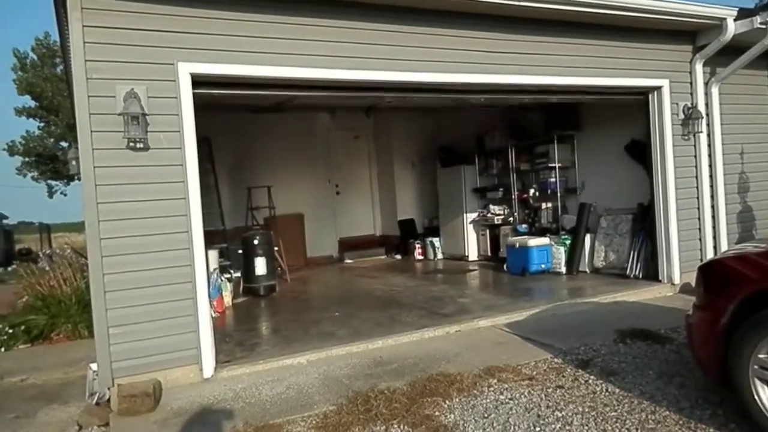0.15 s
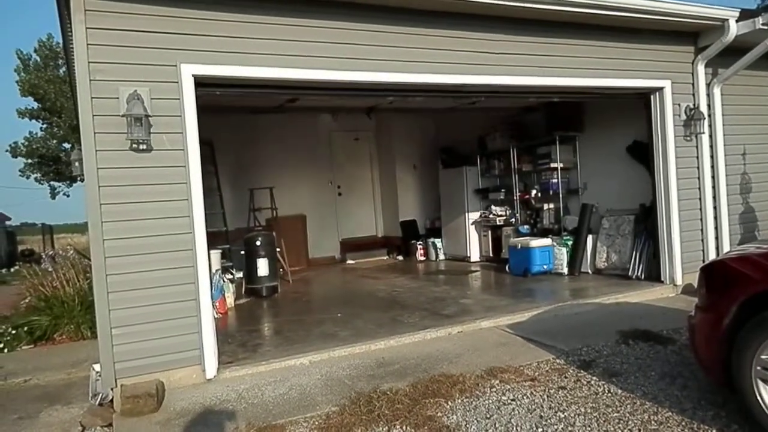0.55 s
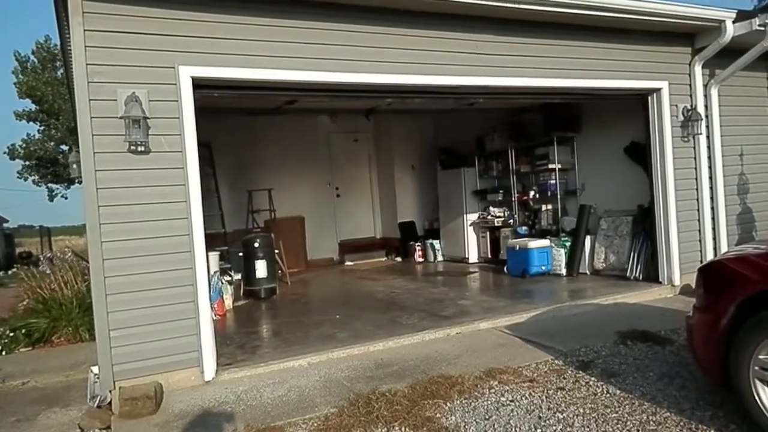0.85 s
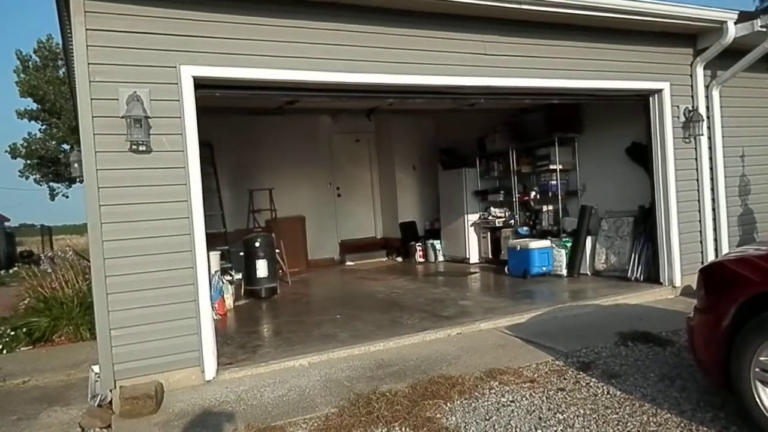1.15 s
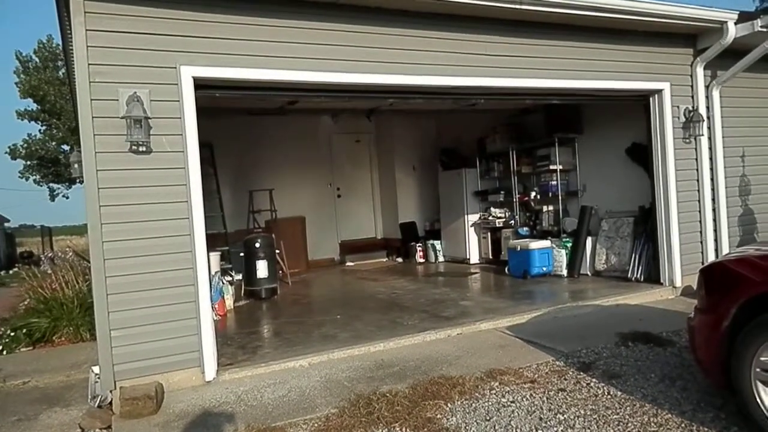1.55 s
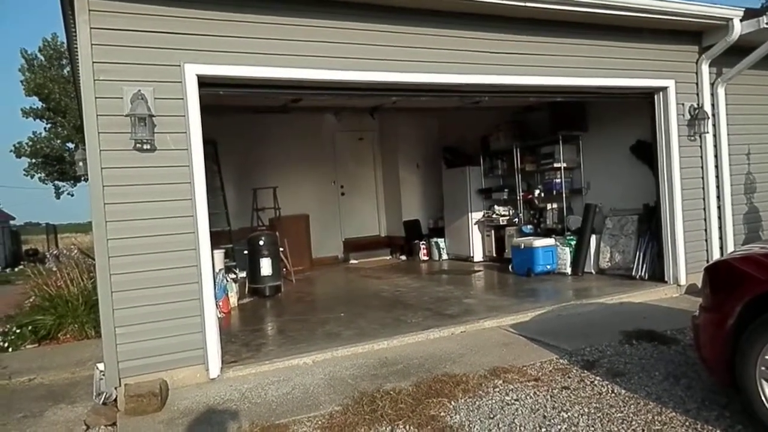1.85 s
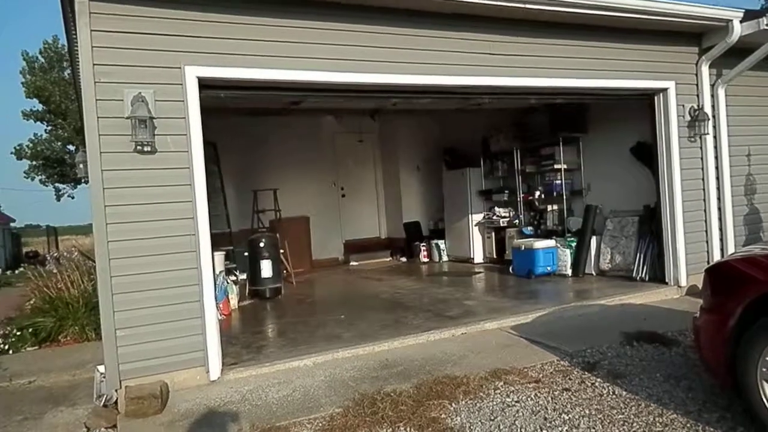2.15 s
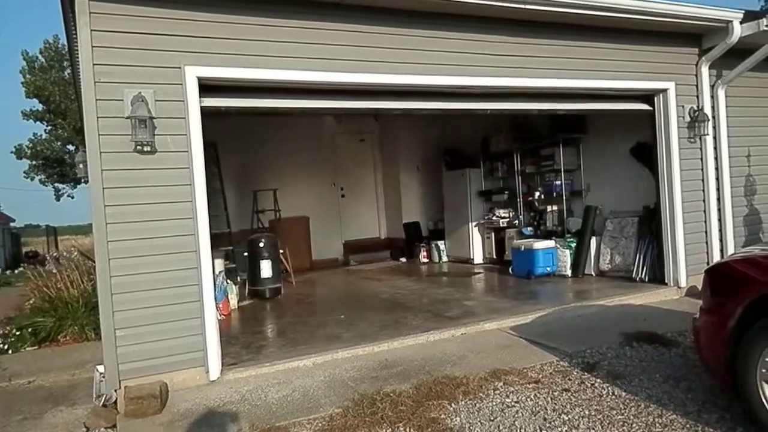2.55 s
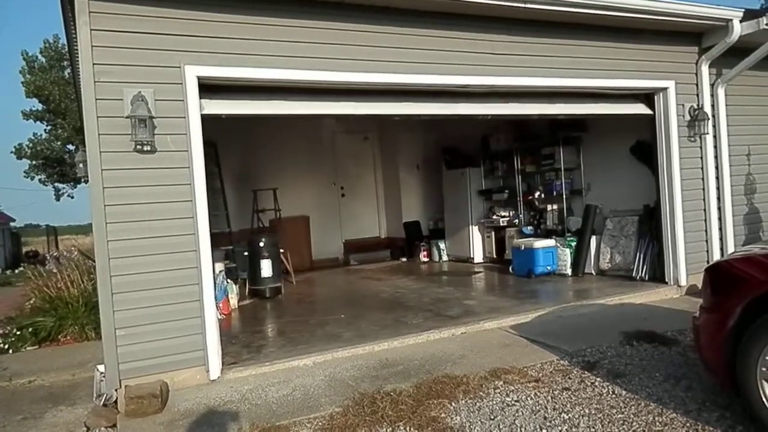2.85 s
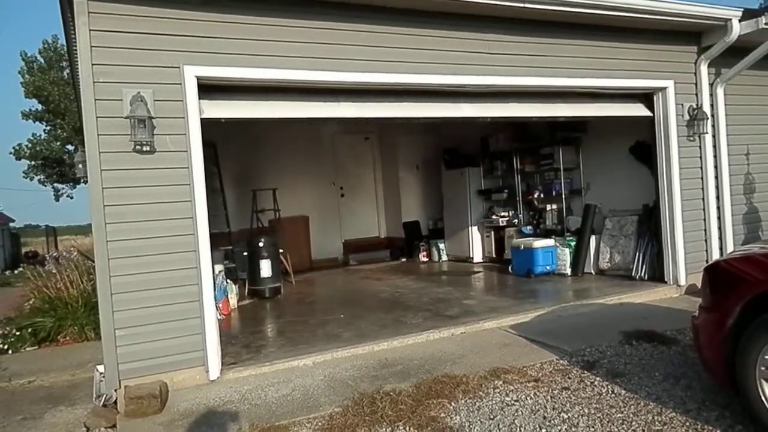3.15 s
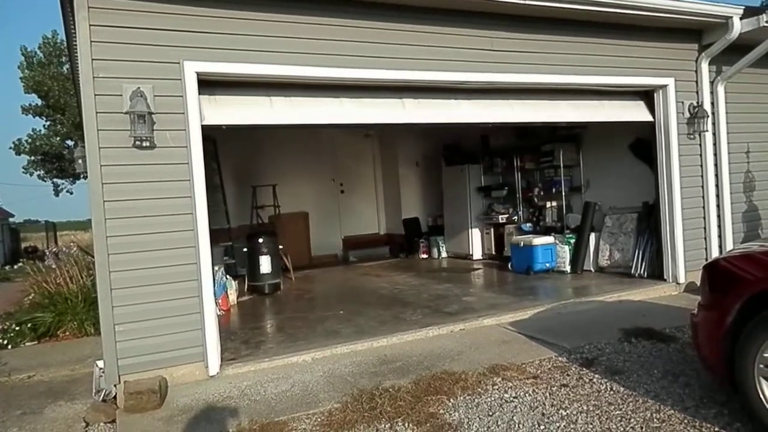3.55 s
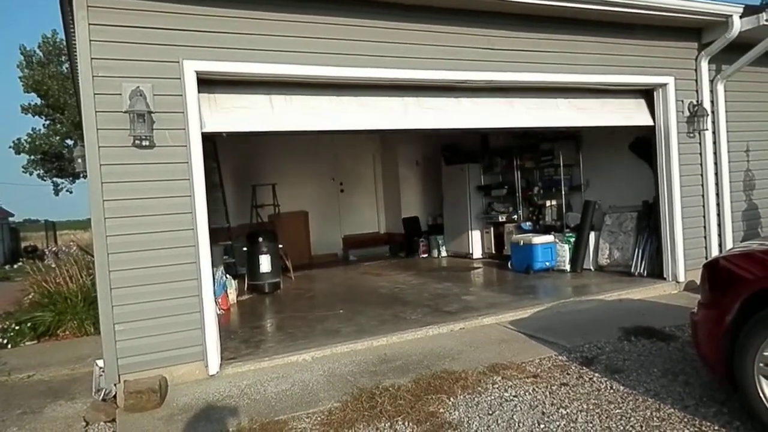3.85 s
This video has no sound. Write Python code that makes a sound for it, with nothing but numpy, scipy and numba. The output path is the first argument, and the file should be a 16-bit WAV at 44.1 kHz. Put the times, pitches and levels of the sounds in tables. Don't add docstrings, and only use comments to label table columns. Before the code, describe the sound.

Electric garage door opener hums low and halts with a clatter; after a pause of light knocks and distant birds, it restarts with booming panels and roller rattles, while wind buffets the outdoor microphone.

```python
import sys
import numpy as np
from scipy import signal
from scipy.fft import rfft, irfft
from scipy.io import wavfile
from scipy.ndimage import uniform_filter1d
from numba import njit

SR = 44100
rng = np.random.default_rng(int(sys.argv[2]) if len(sys.argv) > 2 else 0)


def put_to_file(sound):
    columns = np.atleast_2d(sound).T
    safe = np.clip(columns, -1, 1)
    whole_steps = np.round(safe * 32767)
    wavfile.write(sys.argv[1], SR, whole_steps.astype(np.int16))


def boost(x):
    u = np.asarray(x, float) / 20
    return 10 ** u


N = 176400
T = np.arange(N) / SR

# multiple of the hum, level going up/dB, level going down/dB, share of the buzz
HUM = [(1, -30.5, -39, 0.17), (2, -40.5, -41, 0.023), (3, -46, -43, 1), (4, -57, -56.5, 0.74),
       (6, -53, -61.5, 0.51)]
# t/s, level/dB
DRIVE = [(.1, -2.5), (.165, 1), (.195, -3.5), (.235, -10.5), (.27, -20), (.42, -39), (2.12, -45.5),
         (2.16, -5), (2.22, 1), (2.29, 0.5), (2.6, 2.2)]
# t/s, level/dB
BUZZ = [(2.2, -2), (2.7, 0), (3.0, -3), (3.15, -4), (3.36, -12.5), (3.43, 1.5), (3.75, -1.5), (3.85, -9.5),
        (3.92, -0.5)]
# t/s, level/dB
WHINE = [(2.15, 1), (2.4, -8.5), (3.05, -8), (3.15, 7), (3.7, -1), (3.8, -2), (4, 5)]
# t/s, level/dB
LOAD = [(0, 3.5), (.12, 2.5), (.2, 5.5), (.3, -0.5), (2.2, 1), (2.3, -0.7), (2.6, 1.5), (2.85, -3.5),
        (2.93, -2), (2.98, 2), (3.1, -3), (3.5, -1.5), (3.8, -2), (4, -0.9)]
# f/Hz, level per Hz/dB
PANELS = [(40, -12.5), (110, -1.5), (430, -12.5), (550, -17), (950, -29.5), (1400, -28.5), (4500, -52),
          (14000, -58.5)]
# f/Hz, width/Hz, level/dB
BOOM = [(303.3, 89, -6.5), (396, 78, -9), (750, 330, -11)]
# t/s, level/dB, rise/s, fall/s
RATTLES = [(.2, -48, 0.052, 0.034), (0.248, -45.5, 0.021, 0.06), (2.3, -53, 0.094, 0.25),
           (2.5, -58, 0.029, 0.085), (2.63, -55, 0.046, 0.073), (2.75, -67.5, 0.026, 0.11),
           (2.955, -49.5, 0.018, 0.027), (3.151, -56.5, 0.042, 0.056), (3.29, -54, 0.037, 0.069),
           (3.37, -62, 0.012, 0.045), (3.631, -56.5, 0.13, 0.18), (.04, -61, 0.037, 0.049),
           (2.98, -44.5, 0.021, 0.056), (3.92, -64.5, 0.034, 0.043), (2.16, -61, 0.0094, 0.015)]
# f/Hz, level per Hz/dB
STEEL = [(400, -9), (800, -6.5), (1500, -20.5), (2800, -20.5), (4300, -26), (8700, -26), (11000, -38),
         (15700, -42)]
# f/Hz, width/Hz, level/dB
RAIL = [(700, 130, 6), (820, 60, 5), (1400, 90, 6), (2520, 90, 8), (3000, 100, 8), (3680, 120, 0),
        (7240, 150, 0), (8700, 250, 1)]
# t/s, peak level/dB, f/Hz, low mode level/dB, upper modes level/dB
KNOCKS = [(1.0675, -41.5, 1000, -5, -6), (1.109, -42, 1040, -12, -6), (1.1119, -40, 1040, -12, -3),
          (1.117, -47, 1040, -12, 3), (1.126, -43, 1040, -12, -16), (1.14, -44, 1040, -12, -16),
          (1.158, -38.5, 1050, -12, -15), (1.192, -38.5, 1055, -14, -16), (1.311, -49, 1000, -10, -12),
          (1.846, -47, 1000, -3, -8), (1.8568, -34, 1060, -1, -4), (1.8596, -30.5, 1060, -3, -3),
          (1.8638, -42, 1060, -9, 2), (1.901, -39, 980, -9, -5), (1.9385, -39, 1030, -4, -8),
          (1.9414, -34.5, 1030, -14, -6), (2.154, -38, 950, -2, -4), (2.161, -42, 900, -2, -4)]
# frequency ratio, level/dB, t60/s
SHELL = [(1.39, 0, .018), (1.72, -12, .009), (2.45, -11, .011), (2.7, -14, .01), (3.5, -22, .008)]
# t/s, peak level/dB, f/Hz, width/Hz
TICKS = [(0, -38, 6000, 20000), (.422, -56, 1200, 2200), (.488, -62, 5000, 9000), (.555, -48, 700, 1000),
         (.623, -65, 2100, 700), (.649, -51, 900, 1300), (.688, -47, 850, 1400), (.822, -53, 800, 900),
         (.889, -66, 5000, 6000), (.957, -64, 2100, 250), (1.024, -55, 1000, 1100), (1.222, -55, 2100, 300),
         (1.222, -66, 4000, 5000), (1.274, -58, 1300, 1500), (1.3, -57, 1300, 1500), (1.36, -65, 2050, 250),
         (1.49, -63, 2080, 250), (1.556, -60, 2050, 250), (1.556, -68, 4000, 5000), (1.622, -67, 2050, 250),
         (1.79, -58, 1200, 1500), (1.9412, -40, 1650, 600), (2.125, -60, 7000, 12000),
         (3.643, -52, 2490, 2500), (3.857, -49, 2200, 2000)]
# t/s, length/s, level/dB, top f/Hz
CHIPS = [(0.511, 0.04, -71.5, 6110), (0.825, 0.054, -64, 6220), (0.936, 0.026, -75.5, 5100),
         (1.171, 0.042, -68.5, 6340), (1.507, 0.045, -67.5, 6220), (1.869, 0.057, -70.5, 6240),
         (2.49, 0.055, -67.5, 6000), (3.485, 0.06, -78, 6220), (3.846, 0.045, -68.5, 6240)]
# t/s, length/s, level/dB, from f/Hz, to f/Hz
SLURS = [(0.455, 0.02, -75, 3800, 3740), (0.468, 0.032, -75, 3500, 2630), (0.616, 0.016, -74, 5100, 5000),
         (0.851, 0.035, -75, 5400, 4500), (1.464, 0.082, -75, 5100, 2820), (1.533, 0.018, -82, 2850, 3460),
         (1.551, 0.045, -74, 3400, 3810), (1.59, 0.018, -72, 3200, 2830), (1.617, 0.015, -79, 2750, 2660),
         (1.752, 0.074, -80, 2480, 2280), (1.797, 0.031, -81, 2560, 2640), (1.948, 0.033, -75, 2650, 2630),
         (2.362, 0.013, -65, 8600, 8500), (2.704, 0.014, -77, 10500, 10360)]
# t/s, level/dB, length/s
PUFFS = [
    (0.066, -51, 0.061),
    (1.96, -51.5, 0.069),
    (2.077, -56, 0.036),
    (2.265, -39.5, 0.057),
    (2.65, -48, .05),
    (3.25, -47, 0.068),
    (3.468, -34.5, 0.027),
    (3.955, -56, 0.04),
]
# f/Hz, level per Hz/dB
TRAFFIC = [(18, 0.5), (80, -9.5), (190, -4), (310, -4.5), (430, -18.5), (900, -28.5), (1300, -42),
           (1800, -60)]
# f/Hz, level per Hz/dB
HISS = [(1400, -2.5), (3650, -.5), (4200, -5), (8500, -3.5), (9100, -19), (12800, -16), (13600, -4.5),
        (15750, -3.5)]

HUM_HZ, WANDER_DB = 120.0, 1.2
PANELS_DB, BOOM_DB = -41, -42.5
START_S, RUMBLE_STOP_S, RUMBLE_FALL_DB_S = 2.15, 0.33, 108
GRIT_PER_S, GRIT_DB, GRIT_S, RAIL_WANDER_DB = 1200, 2, .004, 3
LOW_RATIO, LOW_T60_S, MAIN_T60_S = .68, .02, .018
KNOCK_TAIL_DB, KNOCK_TAIL_S, CRACK_DB, TICK_S = -28, .015, -30, .0025
CHIP_DROP, CHIP_RISE_S, CHIP_TRILL, CHIP_ECHO_DB = .22, .005, .03, -4
PUFF_HZ, TRAFFIC_DB, HISS_DB = 35.4, -46.5, -74
GATE_FROM_HZ, GATE_TO_HZ, TOP_HZ = 1500, 13400, 15750
GATE_DB, GATE_CHANCE_DB, GATE_CUT_DB = -101.3, 3.5, -22


def level(x, db):
    return x * boost(db) / np.sqrt(np.mean(x ** 2))


@njit
def svf(x, hz, width):
    y, b, l = np.empty(len(x)), 0., 0.
    g, k = np.tan(np.pi * hz / SR), width / hz
    for i in range(len(x)):
        v = (b + g * (x[i] - l)) / (1 + g * (g + k))
        b, l, y[i] = 2 * v - b, l + 2 * g * v, k * v
    return y


def curve(table):
    return np.interp(T, *np.array(table, float).T)


def walk(rate):
    k = int(SR / rate)
    held = np.repeat(rng.standard_normal(N // k + 1), k)
    return 1.79 * uniform_filter1d(uniform_filter1d(held, k), k)[:N]


def colour(x, table):
    f = np.arange(N // 2 + 1) * SR / N + 1e-3
    hz, db = np.array(table, float).T
    gain_db = np.interp(np.log(f), np.log(hz), db, left=-90, right=-90)
    return irfft(rfft(x) * boost(gain_db), N)


def flicker(table, swell_db, own_db, rate):
    swell, out = swell_db * walk(1.5), 0
    for hz in 30 * 2. ** np.arange(10):
        band = colour(rng.standard_normal(N), [(hz / 2, -12), (hz, 0), (hz * 2, -12)])
        out = out + band * boost(swell + own_db * walk(rate))
    return colour(out, table)


def add(out, start_s, x):
    i = int(start_s * SR)
    out[i:i + len(x)] += x[:N - i]


def motor():
    out = 0
    for k, up_db, down_db, share in HUM:
        phase = 2 * np.pi * (k * HUM_HZ * T + rng.random() + 0.012 * walk(16))
        down = down_db + share * curve(BUZZ) + (k == 6) * curve(WHINE)
        wander = WANDER_DB * (1 + 2 * share ** 2) * walk(12)
        db = np.where(T < 1, up_db, down) + curve(DRIVE) + wander
        out = out + np.sqrt(2) * np.sin(phase) * boost(db)
    return out


def door():
    stopping = boost(-RUMBLE_FALL_DB_S * np.clip(T - RUMBLE_STOP_S, 0, None))
    starting = np.clip((T - START_S) / 0.0096, 0, 1)
    boom = 0
    for hz, width, db in BOOM:
        ring = svf(svf(rng.standard_normal(N), hz, width), hz, width)
        boom = boom + boost(db + 2 * walk(14)) * level(ring, 0)
    rumble = level(flicker(PANELS, swell_db=0.0, own_db=2.0, rate=16), PANELS_DB)
    return (rumble + level(boom, BOOM_DB)) * (stopping + starting) * boost(curve(LOAD))


def rollers():
    shake = 0
    for s, db, rise, fall in RATTLES:
        shape = np.where(T < s, -((T - s) / rise) ** 2, (s - T) / fall)
        shake = shake + boost(db) * np.exp(shape)
    chance, size = rng.random((2, N))
    clicks = (chance < GRIT_PER_S / SR) * boost(-GRIT_DB * np.log(size + 1e-9))
    power = signal.lfilter([1], [1, -np.exp(-1 / (GRIT_S * SR))], clicks ** 2)
    grit = level(np.sqrt(power) * rng.standard_normal(N), 6.3)
    grit = grit + level(flicker([(300, 0.013), (16000, 0.011)], swell_db=5.5, own_db=-5.5, rate=33), 0)
    rail = sum(boost(db + RAIL_WANDER_DB * walk(18)) * svf(grit, hz, width) for hz, width, db in RAIL)
    grit = grit + shake / shake.max() * rail
    return level(colour(grit, STEEL), 0) * shake


def knocks():
    out, t = np.zeros(N), T[:2600]
    for s, db, hz, low_db, upper_db in KNOCKS:
        noise = rng.standard_normal(len(t))
        modes = [(LOW_RATIO, low_db, LOW_T60_S), (1, 0, MAIN_T60_S)]
        modes += [(ratio, mode_db + upper_db, t60) for ratio, mode_db, t60 in SHELL]
        ring = 0
        for ratio, mode_db, t60 in modes:
            decay = np.exp(-np.log(1000) * t / t60)
            ring = ring + boost(mode_db) * np.sin(2 * np.pi * hz * ratio * t) * decay
        crack = boost(CRACK_DB) * svf(noise, 5200.0, 6000.0) * np.exp(-t / .0015)
        tail = boost(KNOCK_TAIL_DB) * 3 * svf(noise, 1280.0, 1000.0) * np.exp(-t / KNOCK_TAIL_S)
        contact = 1 - np.exp(-t / .0004)
        add(out, s, boost(db) * (1.2 * ring * contact + crack + tail))
    return out


def ticks():
    out, t = np.zeros(N), T[:2600]
    for s, db, hz, width in TICKS:
        burst = rng.standard_normal(len(t)) * np.exp(-t / TICK_S)
        burst = svf(svf(burst, hz, width), hz, 2 * width)
        add(out, s, boost(db) * burst / abs(burst).max())
    return out


def note(hz, db):
    envelope = np.sin(np.linspace(0, np.pi, len(hz))) ** 0.12
    return boost(db) * np.sqrt(2) * np.sin(2 * np.pi * np.cumsum(hz) / SR) * envelope


def birds():
    out, waver = np.zeros(N), walk(220)
    for s, length, db, top_hz in CHIPS:
        t = T[:int(length * SR)]
        w = waver[int(s * SR):][:len(t)]
        leap = CHIP_DROP * np.exp(-t / CHIP_RISE_S)
        trill = CHIP_TRILL * abs(w) * t / length
        add(out, s, note(top_hz * (1 - leap - trill), db + 2.6 * w - 2.7 * t / length))
    for s, length, db, from_hz, to_hz in SLURS:
        w = waver[int(s * SR):][:int(length * SR)]
        glide = np.geomspace(from_hz, to_hz, len(w))
        add(out, s, note(glide * (1 + 0.018 * w), db + 2 * w))
    echo = rng.standard_normal(5000) * np.exp(-T[:5000] / .018)
    return out + boost(CHIP_ECHO_DB) * signal.fftconvolve(out, echo / np.linalg.norm(echo))[:N]


def wind():
    gust = sum(boost(db) * np.exp(-((T - s) / length) ** 2) for s, db, length in PUFFS)
    buffet = svf(svf(rng.standard_normal(N), PUFF_HZ, 50.), PUFF_HZ, 60.)
    return level(buffet, 0) * gust


def traffic():
    return level(flicker(TRAFFIC, swell_db=.2, own_db=.8, rate=14), TRAFFIC_DB)


def hiss():
    return level(flicker(HISS, swell_db=1.0, own_db=1.0, rate=13), HISS_DB)


def scene():
    near = motor() + door() + rollers() + knocks() + ticks()
    return (near + birds() + wind() + traffic() + hiss())[None]


def gate(x):
    hz, _, z = signal.stft(x, SR, nperseg=2048, noverlap=1536, boundary="odd")
    hz, z_low = hz[:1024], z[:1024]
    db = 10 * np.log10(np.mean(abs(z_low.reshape(128, 8, -1)) ** 2, axis=1) + 1e-20)
    frames = db.shape[1]
    held = np.repeat(rng.standard_normal((128, frames // 6 + 1)), 6, axis=1)[:, :frames]
    faint = uniform_filter1d(db, size=3) + GATE_CHANCE_DB * held < GATE_DB
    band_hz = hz[::8, None]
    shut = faint & (band_hz > GATE_FROM_HZ) & (band_hz < GATE_TO_HZ)
    gain = np.repeat(np.where(shut, boost(GATE_CUT_DB), 1), 8, axis=0) * (hz[:, None] < TOP_HZ)
    gated = np.vstack([z_low * gain, 0 * z[1024:]])
    return signal.istft(gated, SR, nperseg=2048, noverlap=1536)[1][:N]


def low_pass(x):
    return signal.sosfilt(signal.butter(12, 16290, fs=SR, output="sos"), x)


def record(dry):
    mix = gate(dry[0])[None]
    return low_pass(mix)


dry = scene()
out = record(dry)
put_to_file(out)
```